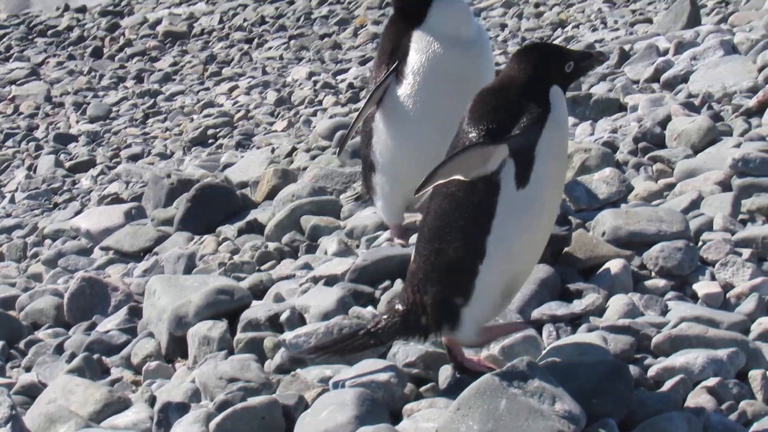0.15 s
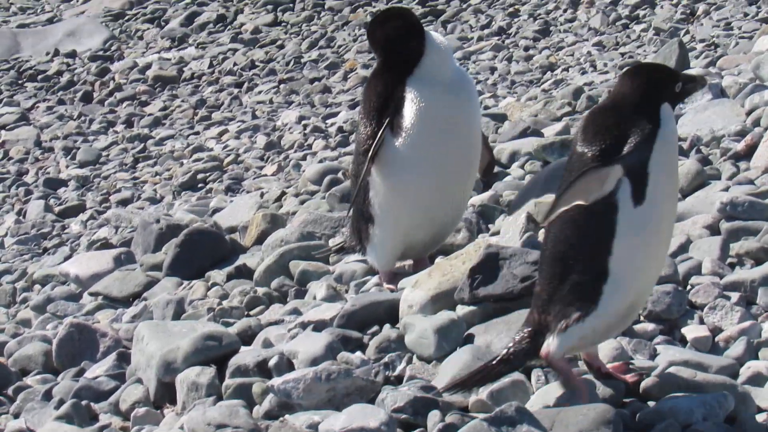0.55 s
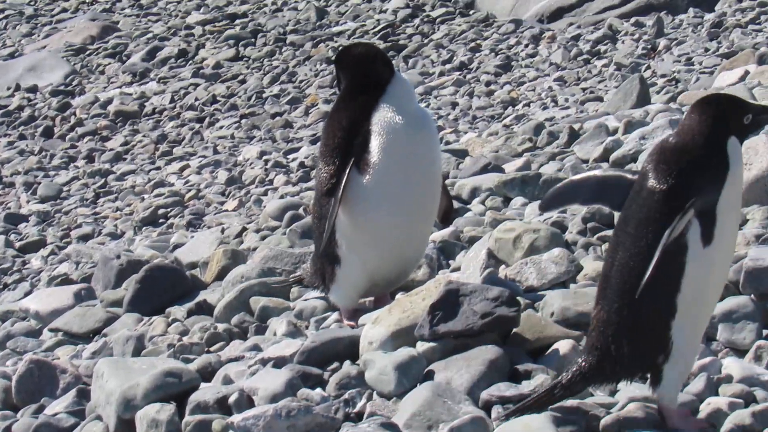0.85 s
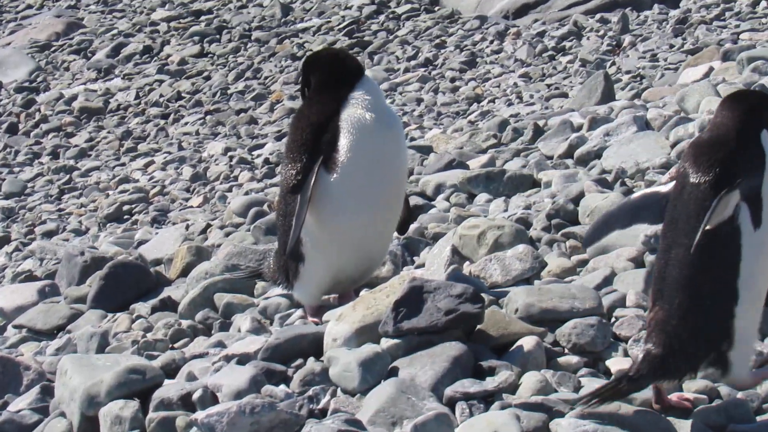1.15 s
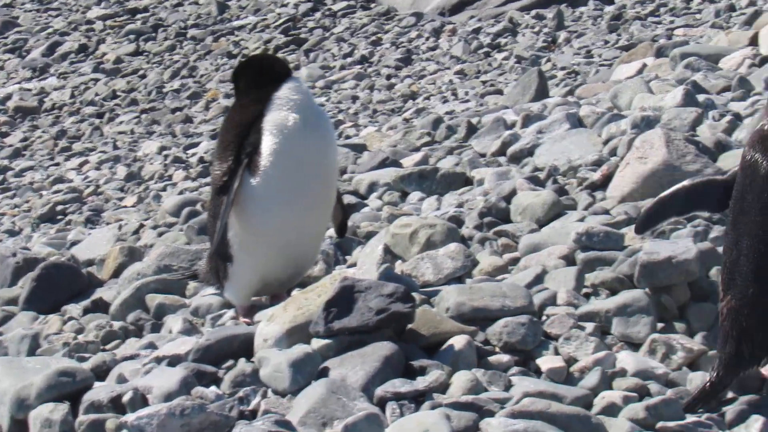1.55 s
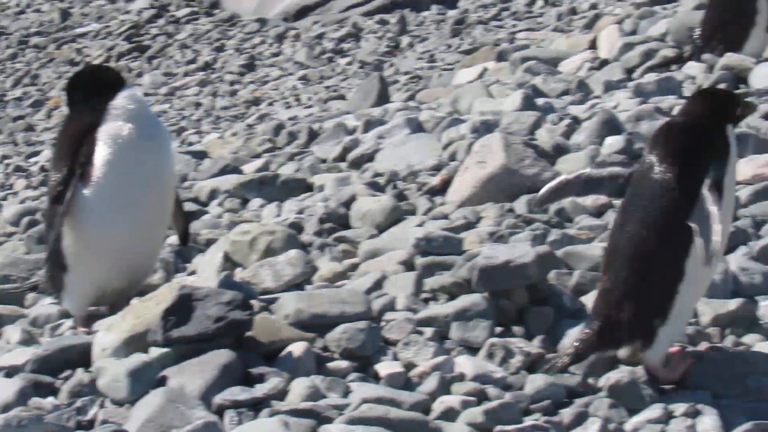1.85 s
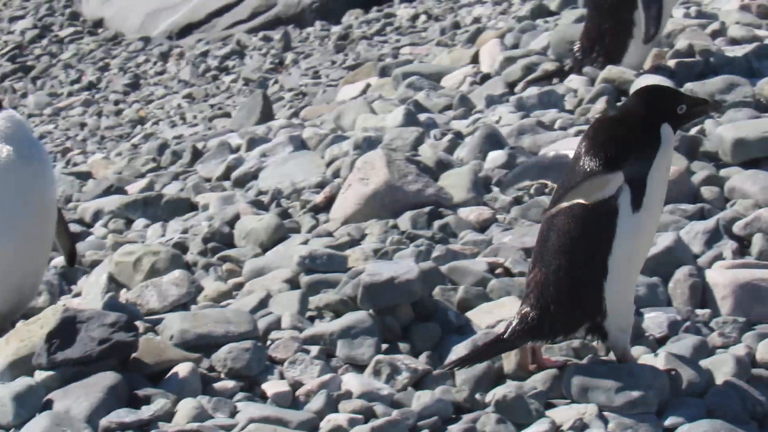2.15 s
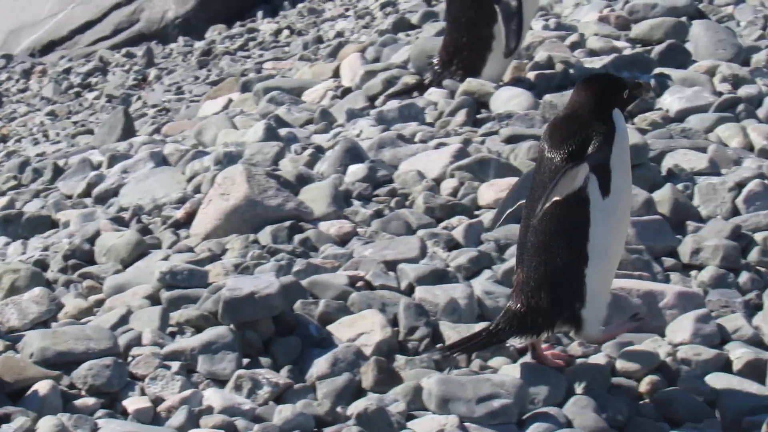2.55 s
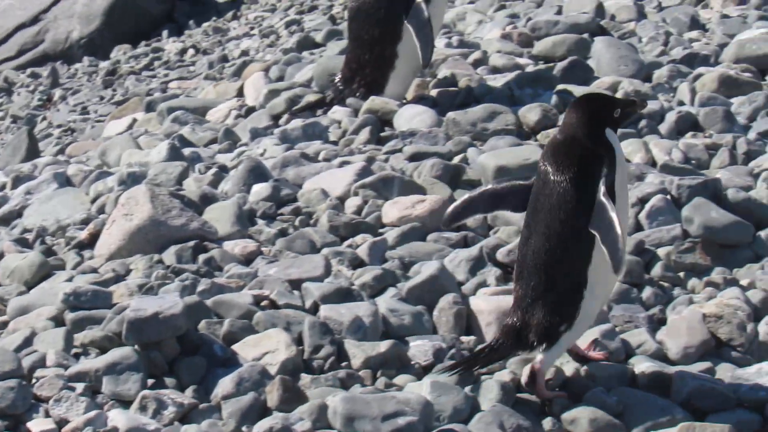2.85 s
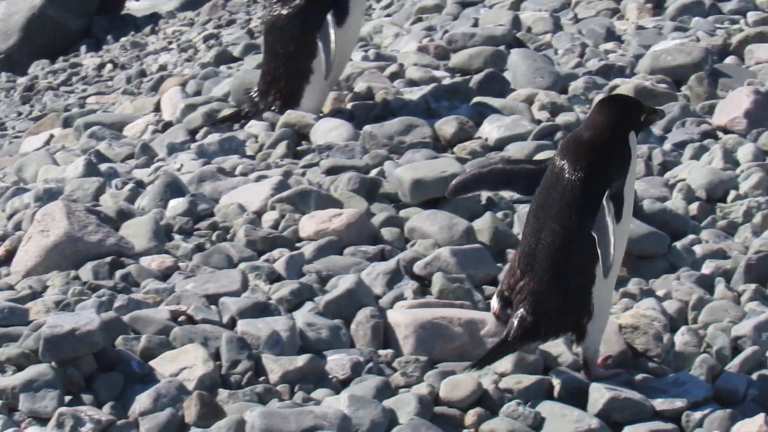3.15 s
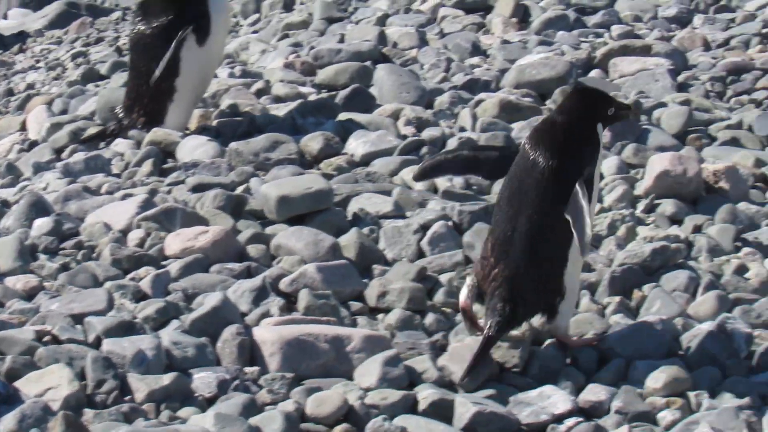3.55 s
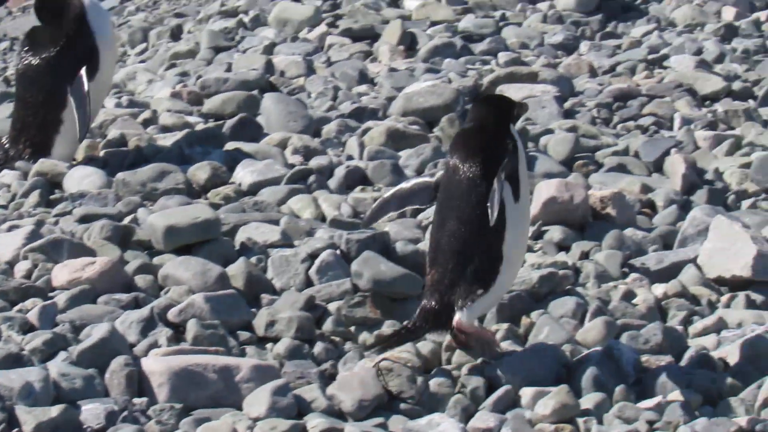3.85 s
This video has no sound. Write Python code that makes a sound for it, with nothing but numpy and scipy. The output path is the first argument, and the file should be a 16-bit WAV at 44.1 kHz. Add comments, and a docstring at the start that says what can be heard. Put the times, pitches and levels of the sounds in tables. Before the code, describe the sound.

A low, gusty wind rumble hits the microphone with thumps that sometimes overload, eases briefly midway, then returns more steadily. Behind it, stones click softly under penguins' feet on a shore, with faint surf and a far engine.

```python
"""A dull, gusty rumble with hard thumps: wind buffets the two microphone ports of a small camera on a
pebble shore. Turbulent pressure drives left and right mostly in antiphase; the hardest puffs overload.
Behind it are distant surf and hiss (shaped noise), a faint engine hum (wavering partials), a few thin
ticks, and pebbles that clack under walking birds, each impact ringing the damped modes of a stone."""
import sys
import numpy as np
from scipy import signal
from scipy.fft import rfft, irfft
from scipy.io import wavfile
from scipy.ndimage import uniform_filter1d

SR = 44100
rng = np.random.default_rng(int(sys.argv[2]) if len(sys.argv) > 2 else 0)


def digitize_waveform(pressure):
    """Quantize a signal to 16-bit integers and store it at the path in sys.argv[1].

    Rows of a 2-D input are taken as channels; values are limited to [-1, 1].
    """
    field = np.atleast_2d(pressure).T
    bounded = np.clip(field, -1, 1)
    quanta = np.round(bounded * 32767).astype(np.int16)
    wavfile.write(sys.argv[1], SR, quanta)


N = 176400
T = np.arange(N) / SR


def undb(db):
    return 10 ** (np.asarray(db) / 20)

def curve(table, col):
    """Linear interpolation of one column over time."""
    rows = np.array(table)
    return np.interp(T, rows[:, 0], rows[:, col])

def drift(rate_hz):
    """Low-pass random modulation: held Gaussian values, smoothed twice; spread near 1."""
    hold = int(SR / rate_hz)
    steps = np.repeat(rng.standard_normal(500)[:N // hold + 1], hold)
    return 1.3 * uniform_filter1d(uniform_filter1d(steps, hold), hold)[:N]

def band_noise(spectrum, flicker_db, rate_hz, tilt=((1, 0), (2, 0))):
    """Spectral shaping: noise of unit rms is tilted, then modulated independently in seven bands."""
    log_f = np.log(np.arange(N // 2 + 1) * SR / N + 1)
    spectrum, tilt = np.array(spectrum), np.array(tilt)
    shape = undb(np.interp(log_f, np.log(spectrum[:, 0]), spectrum[:, 1], left=-90, right=-90))
    shape /= np.sqrt(2 * np.sum(shape ** 2) / N)
    shape *= undb(np.interp(log_f, np.log(tilt[:, 0]), tilt[:, 1]))
    bins, out = rfft(rng.standard_normal(N)) * shape, 0
    centres, spacing = np.linspace(*np.log(spectrum[[0, -1], 0]), 7, retstep=True)
    for centre in centres:
        triangle = np.clip(1 - abs(log_f - centre) / spacing, 0, 1)
        out += irfft(bins * triangle, N) * undb(flicker_db * drift(rate_hz))
    return out

def stereo(mid, side, pan_db=0):
    """Sum and difference: mid is in phase, side in antiphase; pan_db is left over right."""
    return np.array([mid + side, mid - side]) * undb([[pan_db / 2], [-pan_db / 2]])

def add(out, sound, at_s):
    """Superposition of a stereo event on the track."""
    start = int(at_s * SR)
    lo, hi = max(start, 0), min(start + sound.shape[1], N)
    out[:, lo:hi] += sound[:, lo - start:hi - start]


# Background envelopes, dipping after hard puffs: t/s, surf level/dB, hiss level/dB (before fixed gains)
BACKGROUND_LEVELS = [(0, -59.5, -75), (.3, -56.5, -74), (.85, -52.5, -67.5), (.93, -56.5, -72),
                     (1.36, -57.5, -75), (1.42, -60.5, -78), (1.65, -62, -77.5), (2.3, -57.5, -74.5),
                     (2.76, -55.5, -70.5), (2.82, -59.5, -77), (2.96, -62, -77), (2.99, -69, -83.5),
                     (3.2, -63.5, -79.5), (3.6, -62, -79), (4, -59.5, -75.5)]
# Surf spectrum: f/Hz, relative density/dB
SURF_SPECTRUM = [(30, 10), (70, 10), (150, 3.5), (300, 2), (596, -5.5), (826, -5), (1090, -7), (1540, -10),
                 (2500, -17), (4030, -24.5), (5500, -35)]
# Stereo width of the surf: f/Hz, side over mid/dB
SURF_WIDTH = [(200, -7), (690, -2.5), (1260, -5), (2320, -10), (4270, -9)]
BACKGROUND_PAN_DB = 1.6
def surf():
    """Incoherent sources add to noise: distant surf, mostly low, partly correlated between channels."""
    mid = band_noise(SURF_SPECTRUM, flicker_db=.7, rate_hz=14)
    side = band_noise(SURF_SPECTRUM, flicker_db=.7, rate_hz=14, tilt=SURF_WIDTH)
    return undb(curve(BACKGROUND_LEVELS, 1) + 8.5) * stereo(mid, side, BACKGROUND_PAN_DB)

# Hiss spectrum: f/Hz, relative density/dB
HISS_SPECTRUM = [(3000, -29.5), (5000, 11.5), (10600, 5.5), (13000, 1.5), (14900, -20.5)]
def hiss():
    """Decorrelation: independent mid and side noises of nearly equal power make a wide, high hiss."""
    mid, side = (band_noise(HISS_SPECTRUM, flicker_db=.7, rate_hz=14) for _ in range(2))
    return undb(curve(BACKGROUND_LEVELS, 2) + 1) * stereo(mid, undb(-.8) * side, BACKGROUND_PAN_DB)

# Engine partials: f/Hz, level re the surf envelope/dB
HUM_PARTIALS = [(75.5, 14.5), (140.7, 15.5), (247, -5), (317, -4.5)]
def engine_hum():
    """A line spectrum under random amplitude and frequency modulation: a distant engine."""
    hum = 0
    for hz, db in HUM_PARTIALS:
        amplitude = undb(db + 2.5 * drift(22.45))
        cycles = np.cumsum(hz + 1.5 * drift(13.82)) / SR + rng.random()
        hum += amplitude * np.sin(2 * np.pi * cycles)
    return undb(curve(BACKGROUND_LEVELS, 1)) * stereo(hum, 0, BACKGROUND_PAN_DB)

# Thin high ticks: t/s, peak level/dB, centre f/Hz, left over right/dB
HIGH_TICKS = [(0.3333, -46.5, 8200, 0), (0.726, -33, 10100, 2), (2.2363, -55, 12900, 7),
              (2.4176, -46, 10200, 7)]
def ticks(decay_s=.0005, half_width=.24):
    """Band-limited transients: very short noise bursts, band-passed high up, are heard as thin snaps."""
    out, t = np.zeros((2, N)), np.arange(600) / SR
    for at_s, db, hz, pan_db in HIGH_TICKS:
        edges_hz = [hz * (1 - half_width), hz * (1 + half_width)]
        burst = rng.standard_normal((2, len(t))) * t * np.exp(-t / decay_s)
        snap = signal.sosfilt(signal.butter(2, edges_hz, "band", fs=SR, output="sos"), burst)
        mid, side = snap / abs(snap[0]).max() * undb(db)
        add(out, stereo(mid, side * undb(-9), pan_db), at_s)
    return out

# Modes of a pebble: f/Hz, relative level/dB
STONE_MODES = [(450, -8), (800, -6.5), (1346, -7), (1700, -1.5), (2100, -2.5), (2760, 7), (3300, -1),
               (3900, 0), (4700, 3), (5900, 8.5), (7500, 6), (9500, -30)]
def stone_ring(force, treble_db, bass_db, detune=.061, t60_cycles=8):
    """Modal superposition: damped double-pole resonators, a little different for each stone."""
    ring = 0
    for hz, db in STONE_MODES:
        pitch_draw, level_draw = rng.standard_normal(2)
        colour_db = treble_db if hz > 4300 else bass_db if hz < 1900 else 0
        decay_per_s = np.log(1000) * hz / t60_cycles
        pole = np.exp((2j * np.pi * hz * (1 + detune * pitch_draw) - decay_per_s) / SR)
        mode = signal.lfilter([1], [1, -2 * pole, pole ** 2], force).real
        ring += undb(db + 1.5 * level_draw + colour_db) * mode / abs(mode[0]).max()
    cutoff_hz = 10740 * undb(.19 * treble_db)  # sinks with the treble
    return signal.sosfilt(signal.butter(2, cutoff_hz, fs=SR, output="sos"), ring)

# Pebble impacts: t/s, peak level/dB, treble gain/dB, bass gain/dB, factor on the grit's decay time
PEBBLE_IMPACTS = [(0.19, -37.5, -14, 20, 1.1), (0.396, -31.5, -26, 4, 0.43), (0.4228, -19.5, -19, -2, 0.39),
                  (0.4332, -33, -27, 12, 0.54), (0.4576, -26, -14, 0, 0.3), (0.49, -42.5, -8, 9, 0.62),
                  (0.5146, -38, -10, 11, 1.6), (1.0176, -36.5, -18, 6.5, 0.77),
                  (1.1105, -35, -29, 10, 0.47), (1.1334, -33, -14.5, -2, 0.46), (1.2206, -46, -25, -5, 0.4),
                  (1.2553, -35.5, -1, 9, 0.37), (1.392, -43.5, 3, -13, 0.5), (1.5512, -43, -11, 13, 2.1),
                  (1.5768, -36, -13, 3, 1.14), (1.6017, -33, -18, 2, 0.26), (1.6195, -47, -13, -14, 0.82),
                  (1.6377, -33.5, -10, -5, 0.25), (1.665, -43, -23, -7, 0.27),
                  (1.686, -42.5, -13, -18, 0.27), (1.7088, -40.5, -12, 3, 0.39),
                  (1.7622, -46.5, -21, -11, 0.57), (2.9336, -50, -11, 1, 1.8), (3.3644, -38, -30, 14, 0.66),
                  (3.6197, -42, -40, 12, 0.42), (3.687, -42.5, -45, -1, 0.63), (3.7683, -46, -13, 20, 0.68)]
# Direction of the birds' steps: t/s, left over right/dB
STEP_PAN = [(0, 1), (.55, 5), (1.0, -3.5), (4, 1.1)]
def pebbles(grit_decay_s=.016, grit_rise_s=.0002):
    """Impact excitation: under a bird's foot, a sharp blow and the grit after it set a stone ringing."""
    out, t, pan_db = np.zeros((2, N)), np.arange(2000) / SR, curve(STEP_PAN, 1)
    for at_s, db, treble_db, bass_db, length in PEBBLE_IMPACTS:
        grit_envelope = np.exp(-t / (grit_decay_s * length)) * (1 - np.exp(-t / grit_rise_s))
        force = rng.standard_normal((2, len(t))) * grit_envelope
        force[:, 0] = 14  # the blow
        ring = stone_ring(force, treble_db, bass_db)
        mid, side = ring / abs(ring[0]).max() * undb(db)
        add(out, stereo(mid, side * undb(-13), pan_db[int(at_s * SR)]), at_s)
    return out

# Hard puffs of wind: t/s, peak level/dB, centre f/Hz, left over right/dB
HARD_PUFFS = [(0.014, 3.34, 187, 4), (0.122, -18, 140, 9), (0.182, -17.5, 130, -1.5),
              (0.263, -21, 91, -1.7), (0.719, -9, 161, -4), (0.797, -11, 111, -2.8), (0.816, -19, 134, 0.5),
              (0.876, 1.85, 227, -2), (0.891, -0.4, 186, 4), (1.089, -10, 124, -0.5),
              (1.315, -10.5, 112, -0.3), (1.398, -1.17, 178, -3), (1.42, -10, 101, -5),
              (1.502, -10.5, 142, 2), (1.562, -3, 152, -1.2), (1.587, 2.5, 142.6, 2.35),
              (1.854, -18.5, 100, 5), (1.915, -22.5, 95, 3.7), (2.353, -10, 86.6, 4), (2.388, -9, 210, -3),
              (2.546, -8.5, 112, -3.5), (2.616, -8, 112, 1.2), (2.708, -12.5, 162, -7),
              (2.775, -4.5, 188, -3), (2.785, -0.73, 203, -2.3), (2.852, -5, 232, -2),
              (2.877, -0.5, 159, 2.8), (2.924, -5.5, 200, -3), (2.971, 2.5, 126, -1.4),
              (3.151, -6, 129, 1.9), (3.248, -9.5, 198, 1.5), (3.341, 0.5, 123, -0.3),
              (3.397, -2, 148, 2.5), (3.416, -2.5, 200, -1.2), (3.482, -9, 121, -1.2),
              (3.551, -10.5, 160, 1), (3.607, -8, 131, 1.5), (3.629, -2, 144, 0.6), (3.747, -7.5, 117, 2.6),
              (3.881, -8, 147, 1.8), (3.917, -6, 106, 2.5)]
PUFF_SIGMA_CYCLES = .48
def puffs(max_phase_rad=.5):
    """Gaussian wave packets: one main pressure swing between two smaller ones, opposite at the ports."""
    out, t = np.zeros((2, N)), np.arange(-2000, 2000) / SR
    for at_s, db, hz, pan_db in HARD_PUFFS:
        polarity, skew = rng.uniform(-1, 1, 2)
        envelope = np.exp(-.5 * (t * hz / PUFF_SIGMA_CYCLES) ** 2)
        swing = np.sign(polarity) * envelope * np.cos(2 * np.pi * hz * t + max_phase_rad * skew)
        add(out, stereo(0, swing * undb(db) / abs(swing).max(), pan_db), at_s + t[0])
    return out

# Gust envelope: t/s, rumble level/dB, upper band over rumble/dB
GUST_LEVELS = [(0.0, -18, -15.5), (0.13, -21.5, -27), (0.21, -49.5, -71), (0.41, -29, -2), (0.54, -51, -16),
               (0.6, -29, -15), (0.69, -30, -56), (0.85, -13, -22), (1.02, -35.5, -19), (1.32, -25, -22),
               (1.46, -24.5, -35), (1.59, -13, -12.5), (1.64, -25.5, -18), (1.76, -47.5, -33),
               (1.82, -49.5, -9), (1.88, -22, -44), (1.96, -39, -20), (2.24, -44.5, -15),
               (2.37, -20.5, -44), (2.44, -28, -11), (2.52, -22.5, -20.5), (2.67, -24.5, -21.5),
               (2.78, -16, -4), (2.95, -25, -6), (2.985, -10.5, -19), (3.005, -24.5, -13),
               (3.1, -29.5, -20), (3.16, -19, -9.5), (3.38, -23, -16), (3.54, -17.5, -14), (3.62, -16, -15),
               (3.9, -18.5, -20), (4.0, -24, -20)]
# Turbulence spectrum, low band: f/Hz, relative density/dB
RUMBLE_SPECTRUM = [(20, -34), (50, -2), (97, 0.5), (183, -4), (250, -9)]
# Turbulence spectrum, upper band: f/Hz, relative density/dB
UPPER_SPECTRUM = [(250, 4), (336, -4.5), (482, -14.5), (620, -25.5), (886, -37.5), (2210, -76),
                  (5000, -82.5)]
def wind(flutter_db=4.5, flicker_db=1.58, burst_sigma_s=.0041):
    """Turbulent pressure at the ports: an antiphase part and a weaker common part flutter together."""
    rumble_gain = undb(curve(GUST_LEVELS, 1) + flutter_db * drift(40.526))
    upper_gain = rumble_gain * undb(curve(GUST_LEVELS, 2) + flutter_db * drift(45))
    for at_s, db, hz, _ in HARD_PUFFS:  # a puff displaces the rumble and adds an upper-band burst
        near = slice(max(int(at_s * SR) - 1500, 0), int(at_s * SR) + 1500)
        t = T[near] - at_s
        dip = 1 - .9 * np.exp(-.5 * (t * hz / PUFF_SIGMA_CYCLES) ** 2)
        burst = undb(db - 18.5) * np.exp(-.5 * (t / burst_sigma_s) ** 2)
        upper_gain[near] = dip * upper_gain[near] + burst
        rumble_gain[near] *= dip
    side = rumble_gain * band_noise(RUMBLE_SPECTRUM, flicker_db, rate_hz=25)
    side += upper_gain * band_noise(UPPER_SPECTRUM, flicker_db, rate_hz=68)
    mid = undb(-13) * rumble_gain * band_noise(RUMBLE_SPECTRUM, flicker_db, rate_hz=25.45)
    mid += undb(-11) * upper_gain * band_noise(UPPER_SPECTRUM, flicker_db, rate_hz=60)
    return stereo(mid, side)


def housing(sound, notch_hz=700, depth=.8):
    """Antiresonance: the camera housing partly cancels one band."""
    return sound - depth * signal.lfilter(*signal.iirpeak(notch_hz, Q=2.81, fs=SR), sound)

def scene():
    """Superposition: all passes the housing except the puffs, which strike the diaphragms directly."""
    outside = wind() + surf() + engine_hum() + hiss() + pebbles() + ticks()
    return housing(outside) + puffs()

def record(dry, headroom=2.5, cutoff_hz=14970):
    """Saturation and band limiting: the preamp rounds peaks, the converter clips, the top is cut."""
    rounded = headroom * np.tanh(dry / headroom)
    lowpass = signal.ellip(12, .1, 90, cutoff_hz, fs=SR, output="sos")
    return signal.sosfilt(lowpass, np.clip(rounded, -1, 1))


dry = scene()
out = record(dry)
digitize_waveform(out)
```